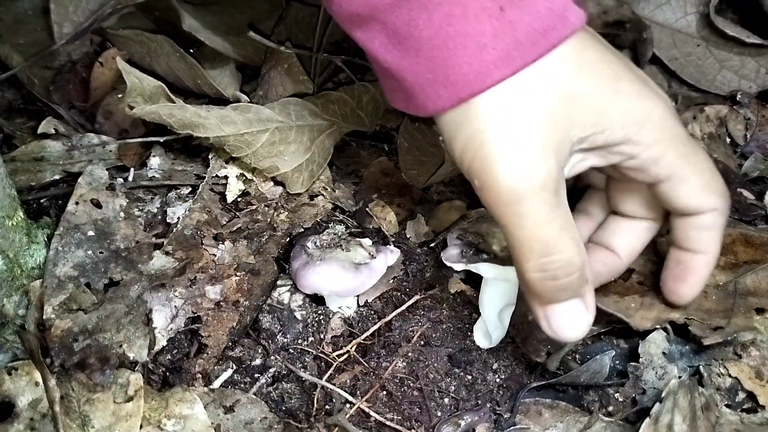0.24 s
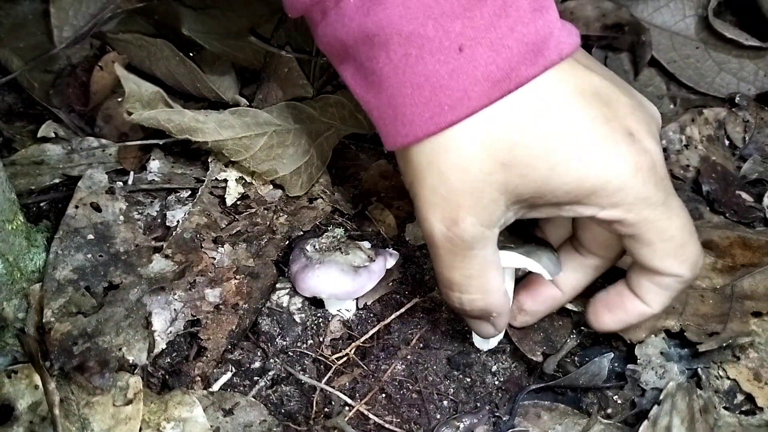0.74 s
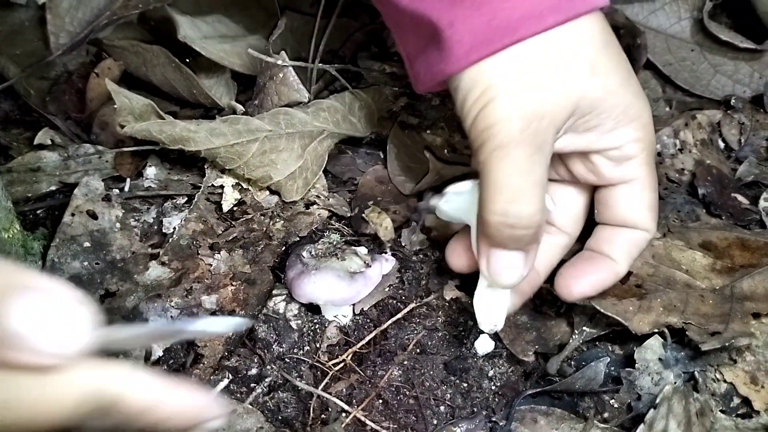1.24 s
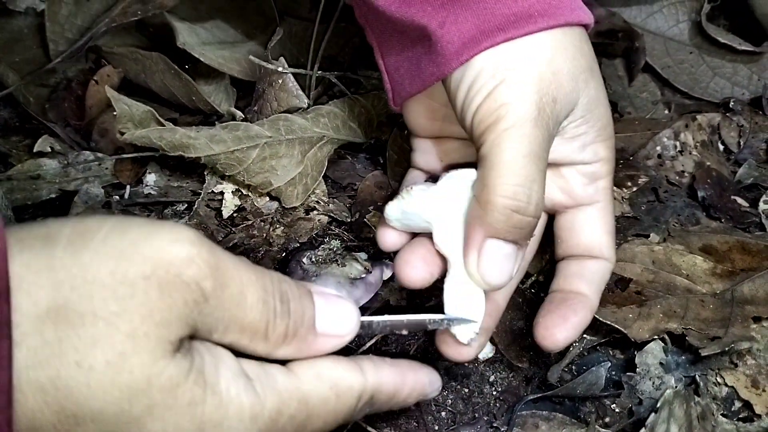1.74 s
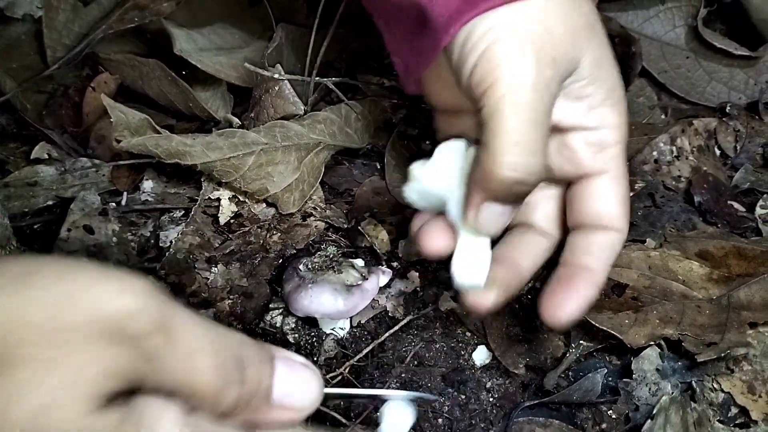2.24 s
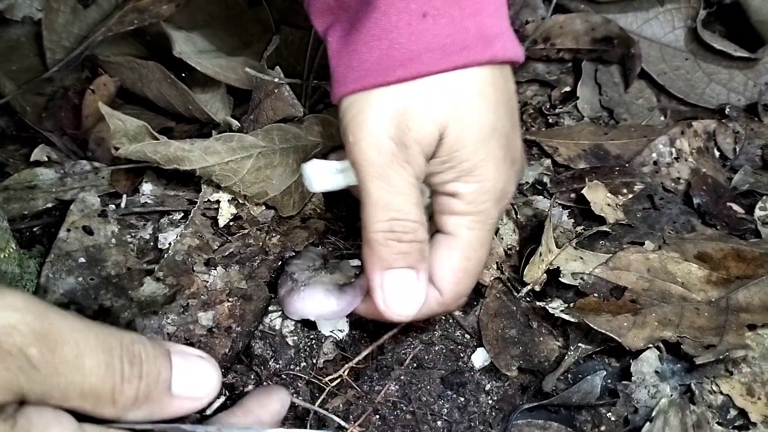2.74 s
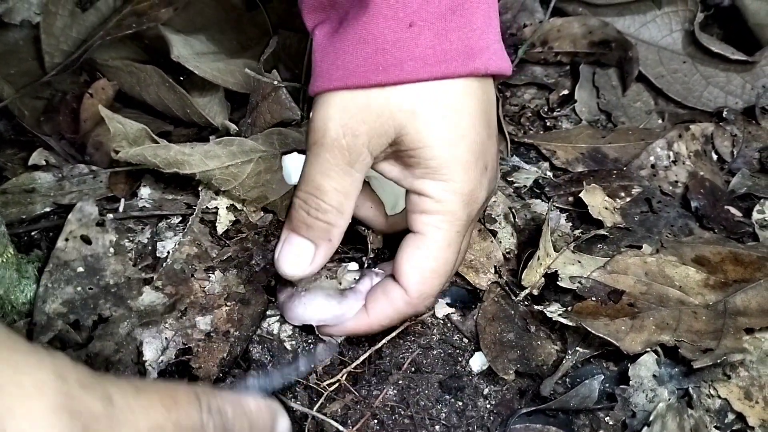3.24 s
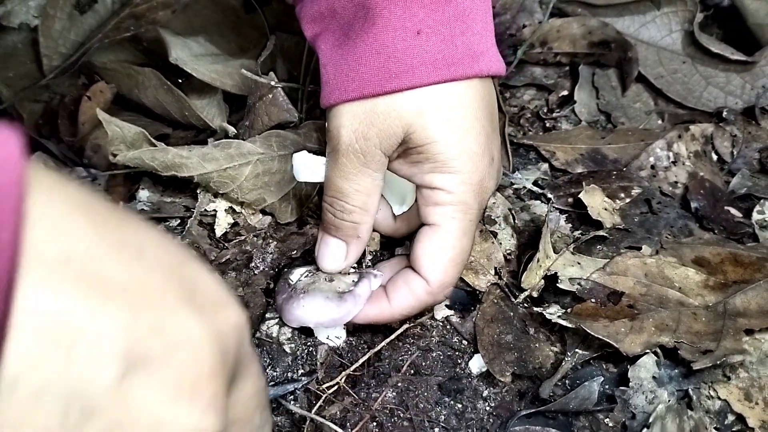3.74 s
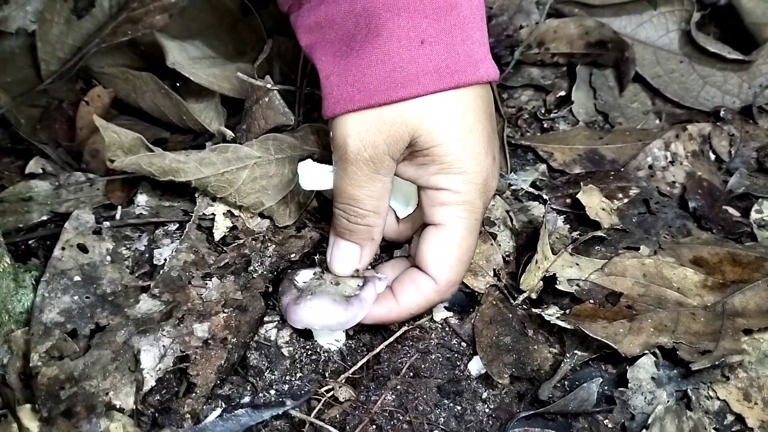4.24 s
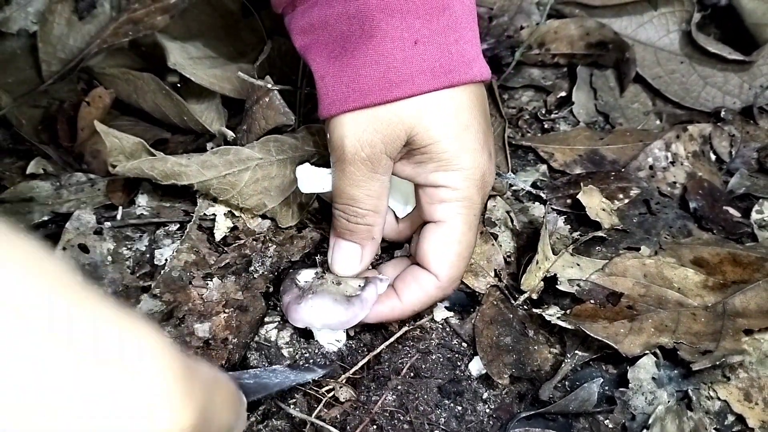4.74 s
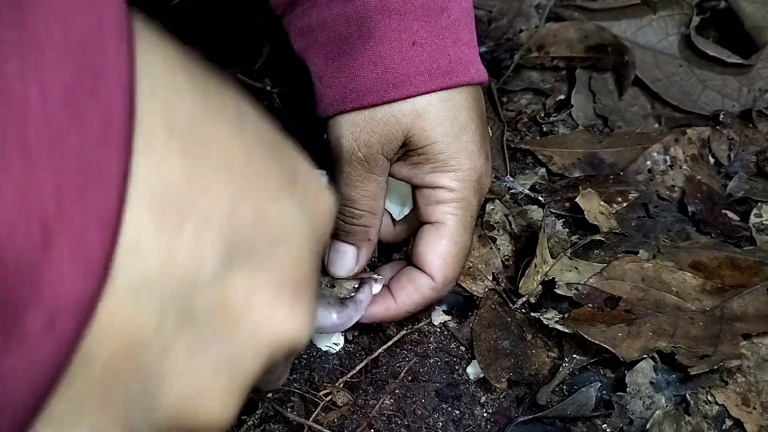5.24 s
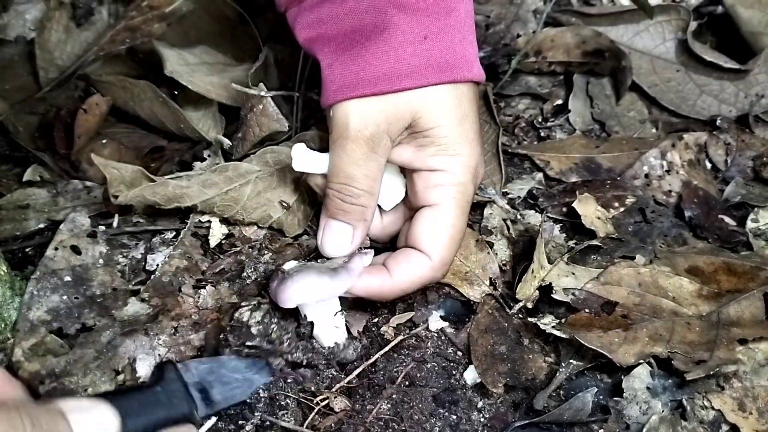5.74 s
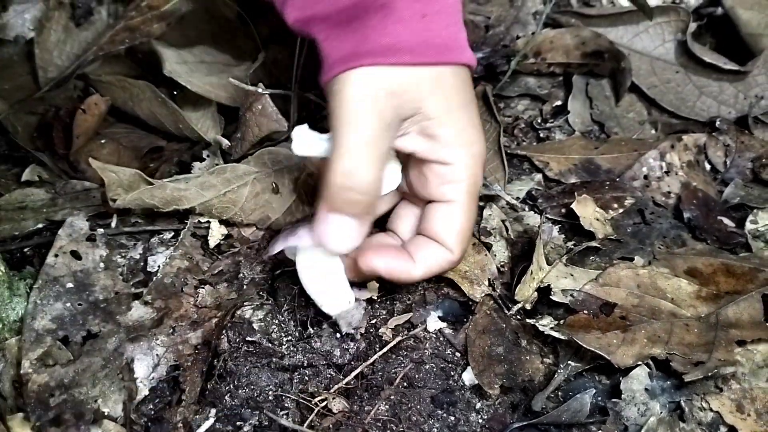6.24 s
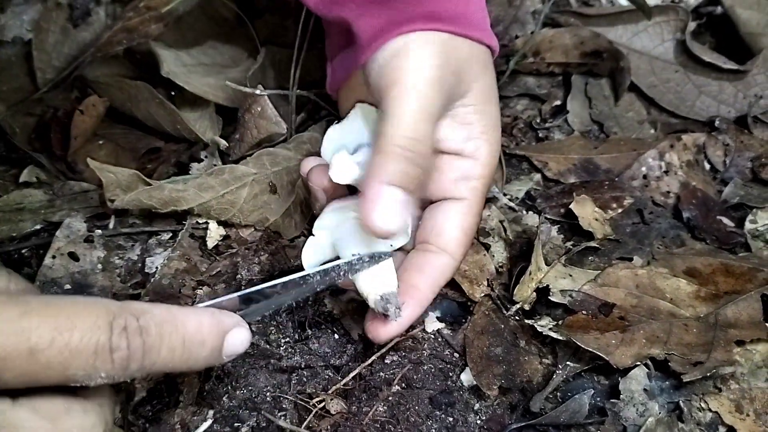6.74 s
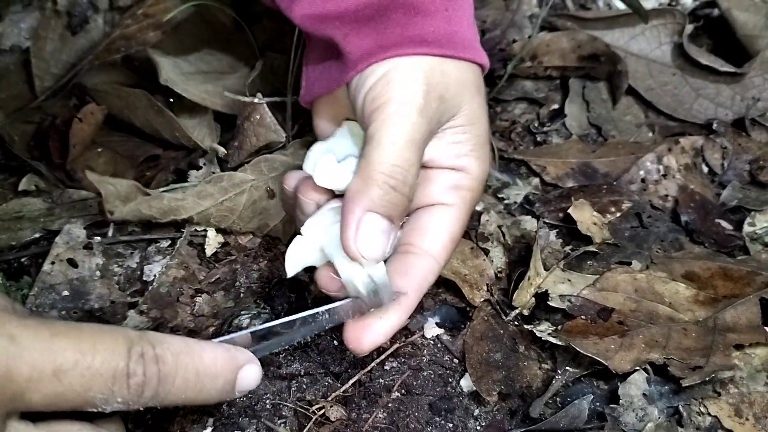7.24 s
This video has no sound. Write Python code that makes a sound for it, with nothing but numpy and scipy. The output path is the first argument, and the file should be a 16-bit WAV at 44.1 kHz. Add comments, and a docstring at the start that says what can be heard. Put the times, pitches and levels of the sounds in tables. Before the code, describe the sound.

Delicate, dry foraging sounds close to the microphones: brushing leaves, flicked flakes, brittle little breaks and dull taps of fingers and a knife in the earth. Short bursts alternate with near-quiet pauses. One clear snap comes early, a dense crunchy dig later, and sparse crackles end it. Outdoors, faint low rumble, gentle hiss and two far engines hum, one swelling and falling twice.

```python
"""Dry leaf litter on a forest floor, close to two microphones: hands pick and trim two mushrooms.
Leaves crackle as shaped noise driven by dense random fractures, and loose flakes ring as decaying sines.
Snapping stalks and twigs are short noise bursts, filtered by soil, leaf blade and leaf edge.
Knife and fingers knock the soil, which adds low damped sines.
Behind lie filtered-noise rumble and hiss, and the hum of two far engines as sums of sines."""
import sys
import numpy as np
from scipy import signal
from scipy.fft import rfft, irfft, next_fast_len
from scipy.io import wavfile
from scipy.ndimage import uniform_filter1d, map_coordinates

SR = 44100
rng = np.random.default_rng(int(sys.argv[2]) if len(sys.argv) > 2 else 0)


def file_out(sig):
    """Save sig as 16-bit WAV at sys.argv[1]."""
    # one column per channel
    cols = np.atleast_2d(sig).T
    # limit, then scale
    lim = np.clip(cols, -1, 1)
    pcm = np.round(lim * 32767).astype(np.int16)
    wavfile.write(sys.argv[1], SR, pcm)


N = 330023

# Background noise colours, relative: [f/Hz, level per Hz/dB]
RUMBLE_COLOUR = [(15, -1.5), (28, -15.5), (45, 1), (65, -3), (100, 0.5), (150, -7), (210, -8), (300, -12.5),
                 (500, -16.5), (1000, -33), (3000, -79)]
HISS_COLOUR = [(200, -2.5), (600, 11.5), (1200, 7.5), (2300, 0.5), (3600, -9), (5600, -21), (7100, -13),
               (7850, 5.5), (8700, -58), (11000, -39), (12800, 2), (14500, -19)]
# A far engine idling, before order levels and balance: [t/s, f/Hz, level/dB]
IDLING_TRACK = [(0, 63.1, -72.5), (2.6, 63.27, -65), (3.6, 63.1, -68), (7.5, 63, -63)]
# Its audible orders: [multiple of f, relative level/dB]
IDLING_ORDERS = [(0.98, -1.7), (2, 0), (7 / 3, -4.5)]
# A far engine that pulls away twice, before order levels and balance: [t/s, f/Hz, level/dB]
PULLING_TRACK = [(0, 84.4, -73), (.45, 87.7, -64.5), (.95, 100.5, -59), (1.25, 101, -71), (2.3, 87.15, -67),
                 (3.1, 87.05, -69), (3.8, 98, -59), (4.3, 103.8, -62.5), (4.8, 105, -84), (6.4, 79.4, -73),
                 (7.5, 88.3, -62)]
# Its audible orders: [multiple of f, relative level/dB]
PULLING_ORDERS = [(4 / 5, -2), (1, 0)]
HUM_WAVER_HZ = 7.7  # random knots a second in the engines' level, on the way through the trees

# Colours of what a fracture sets ringing, relative: [f/Hz, level per Hz/dB]
SOIL_COLOUR = [(40, -39), (90, -2), (130, 0.5), (175, -2.5), (215, -5.5), (295, -8.5), (340, 0),
               (440, -0.5), (540, -3.5), (800, -27), (1500, -39)]
BLADE_COLOUR = [(300, -19.5), (600, -3.5), (770, 7.5), (870, 4), (1050, 5), (1300, 4), (1750, -8.5),
                (2150, -3.5), (2700, -5.5), (3400, -9.5), (4500, -10.5), (8000, -64)]
EDGE_COLOUR = [(1800, -33.5), (3000, -3.5), (3900, 0.5), (5300, 5), (7000, 0), (9500, -3.5), (11500, -1.5),
               (13200, 1), (14500, -10)]
# A light touch leaves only the small, stiff parts of a leaf ringing: [f/Hz, level per Hz/dB]
LIGHT_BLADE_COLOUR = [(300, -29), (650, -4.5), (850, 0), (1150, 0.5), (1600, -2), (2150, 3), (2700, -3.5),
                      (3400, 0.5), (4500, -8.5), (8000, -64.5)]
# Left-right likeness of the spread-out litter: [f/Hz, correlation (1)]
LITTER_ALIKE = [(100, 0.48), (400, 0.61), (900, 0.14), (2000, 0.28), (3500, 0.062), (12000, 0.024)]
# Left-right likeness of one break, which comes from one spot: [f/Hz, correlation (1)]
BREAK_ALIKE = [(100, 0.73), (400, 0.79), (900, 0.3), (2000, 0.68), (3500, 0.23), (12000, 0.17)]
# Port tilt: [f/Hz, level/dB added on the left and taken off on the right]
PORT_TILT = [(300, 0), (1200, 0), (2200, -3), (3300, 2), (5000, -2.5), (7000, -1), (9500, 0.5),
             (12500, -0.5)]

# Fingers and knife knocking into the ground, levels as rms over 10 ms, t60 before the hold shares:
# [t/s, soil level/dB, soil f/Hz, blade level/dB, blade f/Hz, t60/s]
KNOCKS = [(2.8188, -48, 375, -49.5, 2170, 0.011), (2.8232, -46.5, 363, -38, 1040, 0.036),
          (3.6833, -58, 430, -45.5, 1130, 0.013), (3.6917, -53.5, 440, -51, 1110, 0.029),
          (4.0512, -54, 377, -55.5, 2040, 0.0057), (4.1314, -54.5, 440, -52.5, 1700, 0.016),
          (4.214, -43.5, 262, -42, 1900, 0.015), (5.2286, -39.5, 368, -36, 2310, 0.017),
          (5.264, -50, 400, -43, 1300, .008), (5.269, -40.5, 414, -48, 1010, 0.078),
          (5.309, -36.5, 384, -36.5, 815, 0.03), (5.327, -37, 342, -38, 800, 0.033),
          (5.3479, -46, 398, -40.5, 774, 0.072), (5.651, -49, 426, -37.5, 830, 0.049),
          (5.6918, -49.5, 463, -35.5, 1700, 0.0054), (6.1837, -55, 450, -46.5, 1690, 0.02),
          (6.201, -58, 400, -49, 1150, 0.012)]
SOIL_PEAK_DB = 10  # height of a knock's own soil resonance over 0 dB of the soil colour
# Crisp edge against a blade ringing at 1 kHz; smaller, stiffer leaves are crisper
KNOCK_EDGE_DB, KNOCK_EDGE_DB_PER_OCTAVE = -13, 10.5
# Dry leaves, stalks and rootlets breaking, levels as rms over 10 ms, t60 before the hold shares:
# [t/s, blade level/dB, blade f/Hz, crisp edge level/dB, t60/s, left-over-right level/dB]
SNAPS = [(0.335, -56, 3320, -48.5, .07, -2), (0.402, -53, 3350, -57, 0.081, 0),
         (0.615, -48.5, 1660, -44.5, .043, -5), (0.822, -53.5, 3100, -46.5, .07, -9),
         (0.9953, -62, 1360, -52.5, .018, -3), (1.026, -47, 1220, -52, 0.073, -9),
         (1.123, -51.5, 1744, -72, .035, -3), (1.2005, -48, 3240, -47.5, 0.0043, -3),
         (1.3588, -48, 2210, -39, .011, 3), (1.3864, -36.5, 2130, -34.5, 0.063, 3),
         (1.4089, -27, 2150, -35, 0.014, -0.5), (1.6408, -53.5, 2140, -50.5, 0.028, -2),
         (1.6762, -49.5, 2190, -46.5, .073, 0), (1.929, -57, 1380, -72, 0.011, -1),
         (1.9615, -41.5, 2460, -43.5, 0.033, 2), (2.414, -57, 2200, -44.5, 0.05, 3),
         (2.4891, -62, 2400, -43, 0.064, 0), (3.017, -43, 1990, -46, 0.019, -7),
         (3.077, -37.5, 2000, -40.5, 0.054, -1), (3.1593, -60, 3100, -37, 0.022, -4),
         (3.203, -49, 1250, -56, 0.068, 0), (3.306, -59, 2700, -49.5, 0.0081, 1),
         (3.822, -57.5, 1020, -56, .014, 14), (3.844, -51.5, 2150, -39, 0.017, 5),
         (3.9358, -44.5, 2140, -50, 0.0051, -8), (3.975, -69, 2850, -51.5, .019, 0),
         (4.365, -82, 2200, -54.5, 0.022, 0), (5.136, -70, 3230, -51.5, 0.036, -2),
         (5.1712, -46, 2220, -43, 0.006, -2.5), (5.6001, -39.5, 1580, -42, .005, -6),
         (5.6425, -48, 1820, -40, 0.061, -1), (5.687, -38, 1740, -46, 0.036, 4),
         (5.728, -42, 2270, -40.5, 0.048, 4), (5.7557, -34, 2020, -48, 0.019, 4.5),
         (5.8205, -35.5, 1050, -34, 0.011, 1.5), (5.922, -50, 2280, -48, .049, 8),
         (6.0959, -71, 1800, -47, 0.063, -2), (6.2336, -58, 3240, -47.5, 0.012, 0),
         (6.3512, -45.5, 1630, -48, .036, 2), (6.441, -50.5, 1160, -59, 0.077, 9),
         (6.635, -69, 2520, -61.5, 0.012, -7.5), (6.7616, -90, 2000, -54.5, 0.0068, -2),
         (6.8953, -50.5, 3470, -45.5, 0.086, -5), (7.3317, -49.5, 3370, -44, 0.083, 0),
         (7.44, -56.5, 1930, -60, 0.043, -9)]
SNAP_SOIL_DB, SNAP_SOIL_HZ = -25.5, 490  # a break barely shakes the soil: level against blade, resonance
EDGE_HZ, EDGE_SCATTER = 5700, 0.42  # where a breaking edge rings, and its log spread between breaks

# Hands moving through the litter: feeling for, pulling up and trimming the first stem, reaching across,
# gripping the second, probing, digging in the knife, levering, lifting clear and scraping the stem:
# [t/s of the height, rise/s, fall/s, blade level/dB before the mix trim,
#  pressure (0 = brushing leaf edges, 1 = pushing into the soil)]
STROKES = [(0.27, 0.17, 0.033, -57, 0.39), (0.41, 0.02, 0.013, -57, 0.043), (0.62, 0.03, 0.033, -61, 0.45),
           (0.82, 0.21, 0.07, -63.5, 0.24), (1.04, 0.048, 0.095, -60, 0.4), (1.15, 0.02, .07, -56, .3),
           (1.29, 0.15, 0.08, -52, 0.33), (1.41, 0.089, .12, -51, 0.34), (1.612, 0.099, 0.018, -54.5, 0.18),
           (1.69, 0.049, 0.069, -57.5, 0.18), (1.98, 0.016, 0.033, -53, 0.3),
           (2.09, 0.054, 0.026, -60.5, 0), (2.25, .015, 0.13, -65, 0), (2.40, 0.036, 0.064, -47.5, 0.13),
           (2.47, 0.062, 0.07, -52, 0.4), (2.73, 0.047, 0.038, -60, 0.34),
           (2.837, 0.0057, 0.023, -50, 0.65), (2.94, 0.1, 0.043, -59.5, 0.21),
           (3.09, 0.076, .06, -51, 0.46), (3.18, 0.063, 0.036, -51, 0.029),
           (3.26, 0.071, 0.078, -61.5, 0.41), (3.70, 0.055, 0.084, -60, 0.48),
           (3.85, 0.046, 0.024, -56, 0.35), (3.98, 0.18, 0.11, -60, 0.39), (4.14, 0.04, 0.038, -57.5, 0.64),
           (4.232, 0.031, 0.053, -51.5, 0.33), (4.31, .05, 0.12, -70, 0.018),
           (4.69, 0.042, 0.17, -69, 0.092), (5.18, 0.037, 0.15, -53, 0.69), (5.28, 0.033, 0.043, -47, 0.27),
           (5.32, 0.047, 0.06, -41.5, 0.68), (5.49, 0.057, 0.044, -60.5, 0.15),
           (5.60, 0.1, 0.088, -49.5, 0.57), (5.71, 0.053, .075, -41, 0.55), (5.85, 0.043, 0.064, -47, 0.38),
           (5.91, .05, 0.058, -46.5, 0.45), (6.025, 0.031, 0.018, -64.5, 0),
           (6.20, .02, 0.061, -52.5, 0.83), (6.35, 0.13, 0.27, -64, 0.23),
           (6.54, 0.026, 0.055, -63.5, 0.47), (7.258, 0.011, 0.082, -61.5, 0),
           (7.35, 0.1, 0.052, -64.5, 0.58)]
STROKE_DROP_DB, STROKE_SHAPE = 9, 1.53  # drop one rise before and one fall after; above 1 = rounded top
# Faint stir of leaves under the hand between strokes: [t/s, blade level/dB before the mix trim]
STIR = [(0, -59), (1.2, -69.5), (1.85, -70), (2.2, -70), (3.0, -67), (4.4, -70), (4.95, -71.5), (6.3, -67),
        (6.8, -73), (7.2, -75.5), (7.48, -66)]
STIR_PRESSURE = 0.39
SOIL_DB, SOIL_PRESS_DB = -23.5, 24.5  # soil against blades at no pressure; what full pressure adds
EDGE_DB, EDGE_PRESS_DB = 8.5, -11.5  # the same for the crisp edges
BEND_FROM_DB, BEND_RANGE_DB = -15, 7.5  # soil against blades where whole leaves start to bend; range to all

FADE_IN_S = 0.36
TOP_HZ = 14400  # band limit


def amp(db):
    """Decibel law: level to amplitude ratio."""
    return 10 ** (np.asarray(db) / 20)


def unit(x):
    """Normalisation to unit rms."""
    return x / np.sqrt(np.mean(x ** 2) + 1e-20)


def along(points, hz):
    """Interpolation of [f/Hz, value] points on a logarithmic frequency axis."""
    f, v = np.transpose(points)
    return np.interp(np.log(hz + 1), np.log(f + 1), v)


def curves(rows):
    """Linear interpolation in time: one value per sample for each column after t/s."""
    s, *cols = np.transpose(rows)
    return [np.interp(np.arange(N) / SR, s, c) for c in cols]


def wobble(rate):
    """Spline through Gaussian knots: a smooth random curve with rate knots a second."""
    knots = rng.standard_normal(int(N * rate / SR) + 4)
    return map_coordinates(knots, [np.arange(N) * rate / SR])


def grid(x):
    """Zero padding: an even FFT length longer than x, and its frequencies."""
    m = 2 * next_fast_len(x.shape[-1] // 2 + 1024)
    return m, np.fft.rfftfreq(m, 1 / SR)


def ring(x, spectrum, peak_hz=1000, peak_db=0, octaves=.2):
    """Minimum-phase filtering: x excites a body of this colour, with an optional resonance peak_db over 0 dB."""
    m, hz = grid(x)
    gain = amp(along(spectrum, hz))
    if peak_db:
        detune = np.log2((hz + 1) / peak_hz) / octaves
        gain = np.hypot(gain, amp(peak_db) / (1 + detune ** 2) ** 1.6)
    # folding the cepstrum onto positive time makes the response causal
    cepstrum = irfft(np.log(gain), m)
    cepstrum[1:m // 2] *= 2
    cepstrum[m // 2 + 1:] = 0
    response = np.exp(rfft(cepstrum))
    return irfft(rfft(x, m) * response, m)[..., :x.shape[-1]]


def ports(pair, alike=LITTER_ALIKE, lag_ms=0.344):
    """Partial coherence: two unrelated signals become a partly alike stereo pair, the right port lagging."""
    m, hz = grid(pair)
    turn = np.arccos(np.clip(along(alike, hz), 0, 1)) / 2
    mid, side = rfft(pair, m) * [np.cos(turn), np.sin(turn)]
    tilt = amp(along(PORT_TILT, hz))
    late = np.exp(-2j * np.pi * hz * lag_ms / 1000)
    left = (mid + side) * tilt
    right = (mid - side) * late / tilt
    return irfft([left, right], m)[:, :pair.shape[-1]]


def engine(track, orders, waver_db):
    """Harmonic orders: a far engine's few audible multiples of one pitch waver on the way through the trees."""
    hz, db = curves(track)
    phase = 2 * np.pi * np.cumsum(hz * (1 + 0.0053 * wobble(4.4))) / SR
    hum = 0
    for multiple, level in orders:
        waver = waver_db * wobble(HUM_WAVER_HZ)
        hum = hum + amp(db + level + waver) * np.sin(multiple * phase)
    return hum


def air(spectrum, width):
    """Mid-side synthesis: coloured noise whose side part sets the stereo width."""
    mid, side = ring(rng.standard_normal((2, N)), spectrum)
    return unit(np.array([mid + width * side, mid - width * side]))


def forest(rumble_db=-61.5, hiss_db=-69, rumble_width=0.83, hiss_width=0.97):
    """Superposition of low rumble, faint hiss and the hum of two far engines."""
    hum = engine(IDLING_TRACK, IDLING_ORDERS, waver_db=3.5) + engine(PULLING_TRACK, PULLING_ORDERS, waver_db=2.5)
    rumble = amp(rumble_db + 1.2 * wobble(10)) * air(RUMBLE_COLOUR, rumble_width)
    balance = amp([[1.1], [-1.1]])  # left and right, in dB
    hiss = amp(hiss_db + 0.65 * wobble(3.28)) * air(HISS_COLOUR, hiss_width)
    return (rumble + hum) * balance + hiss


def thumps(hz=168, scatter=0.11, t60=.05, attack_s=0.00098, db=-1, grows=0.86, size=4096):
    """Damped oscillation: under each knock the ground gives one low bounce, grows dB per dB of the knock."""
    out, t = np.zeros(N + size), np.arange(size) / SR
    heaviest_db = max(row[1] for row in KNOCKS)
    for (s, soil_db, *_), chance in zip(KNOCKS, rng.standard_normal(len(KNOCKS))):
        level_db = heaviest_db + db + grows * (soil_db - heaviest_db)
        pitch = hz * np.exp(scatter * chance)
        bounce = np.sin(2 * np.pi * pitch * t) * (1 - np.exp(-t / attack_s))
        out[round(s * SR):][:size] += amp(level_db - 60 * t / t60) * bounce
    return out[:N]


def contacts(snap_peak_db=13.0, knock_peak_db=9):
    """Selective excitation: a snap rings a leaf's stiff parts, a centred knock bends it whole and thuds in soil."""
    # yields t/s, t60/s, pan/dB, soil and blade as (colour, level/dB, f/Hz, peak/dB), edge level/dB
    for s, blade_db, blade_hz, edge_db, t60, pan_db in SNAPS:
        soil = (SOIL_COLOUR, blade_db + SNAP_SOIL_DB, SNAP_SOIL_HZ, 3)
        blade = (LIGHT_BLADE_COLOUR, blade_db, blade_hz, snap_peak_db)
        yield s, t60, pan_db, soil, blade, edge_db
    for s, soil_db, soil_hz, blade_db, blade_hz, t60 in KNOCKS:
        edge_db = blade_db + KNOCK_EDGE_DB + KNOCK_EDGE_DB_PER_OCTAVE * np.log2(blade_hz / 1000)
        soil = (SOIL_COLOUR, soil_db, soil_hz, SOIL_PEAK_DB)
        blade = (BLADE_COLOUR, blade_db, blade_hz, knock_peak_db)
        yield s, t60, 0, soil, blade, edge_db


def broadband(x, size=25):
    """Spectral whitening: a fracture feeds all frequencies alike, so its colour comes from what it rings."""
    z = rfft(x)
    local_power = abs(uniform_filter1d(abs(z) ** 2, size, axis=-1))
    return irfft(z / np.sqrt(local_power + 1e-12), x.shape[-1])


def snaps(rise_ms=0.17, strain_ms=0.78, strain_db=-15, grain_db=4.5, soil_hold=1.77, blade_hold=1.0,
          edge_hold=0.97, edge_peak_db=3, size=3072):
    """Brittle fracture: creaking strain, then a quick run of breaks rings soil, blade and edge; knocks likewise."""
    lead = SR // 160  # samples of strain ahead of the break
    out, t = np.zeros((2, N + size)), (np.arange(size) - lead) / SR
    before, after = np.maximum(-t, 0), np.maximum(t, 0)
    strain = amp(strain_db) * np.exp(-before * 1000 / strain_ms)
    attack = np.maximum(strain, (1 - np.exp(-after * 1000 / rise_ms)) ** 2)
    for s, t60, pan_db, soil, blade, edge_db in contacts():
        unevenness = unit(uniform_filter1d(rng.standard_normal(size), size=16))
        grain = attack * amp(grain_db * unevenness)
        start = round(s * SR) - lead
        sides = unit(amp(pan_db / 2 * np.array([[1], [-1]])))
        edge_hz = EDGE_HZ * np.exp(EDGE_SCATTER * rng.standard_normal())
        edge = (EDGE_COLOUR, edge_db, edge_hz, edge_peak_db)
        # (body, resonance width in octaves, share of the t60, lag between the ports in ms)
        parts = [(soil, .16, soil_hold, .13), (blade, .2, blade_hold, .38), (edge, .3, edge_hold, .38)]
        for (spectrum, db, hz, peak_db), octaves, hold, lag_ms in parts:
            decay = amp(-60 * after / (t60 * hold))
            run = broadband(grain * decay * rng.standard_normal((2, size)))
            burst = ports(ring(run, spectrum, hz, peak_db, octaves), BREAK_ALIKE, lag_ms)
            burst /= np.sqrt(np.sum(burst ** 2, axis=1, keepdims=True) / (SR / 100))  # rms over 10 ms
            out[:, start:start + size] += amp(db) * sides * burst
    return out[:, :N]


def fractures(rate, spread_db, bed, life_ms):
    """Shot noise: random tiny breaks of uneven size, each a short fizz, over a bed of sliding friction."""
    count = int(rate * N / SR)
    draws = rng.random((count, 2))
    size = amp(spread_db * np.minimum(-np.log(1 - draws[:, 1]), 4.5))
    power = np.bincount((draws[:, 0] * N).astype(int), size ** 2, N)
    # power decays twice as fast as amplitude
    power = signal.lfilter([1], [1, -np.exp(-2000 / (life_ms * SR))], power)
    envelope = np.sqrt(power / power.mean() + abs(bed) + 1e-12)
    return envelope * rng.standard_normal((2, N))


def ticks(rate, centre_hz, scatter, cycles, spread_db, size=480):
    """Free vibration: each leaf flake flicked loose rings at its own pitch and place, losing 60 dB in cycles."""
    count = int(rate * N / SR)
    when, place, strength, phase = rng.random((count, 4)).T[:, :, None]
    hz = np.clip(centre_hz * np.exp(scatter * rng.standard_normal((count, 1))), 700, 14000)
    turns = hz * np.arange(size) / SR
    flake_db = spread_db * np.minimum(-np.log(1 - strength), 4)
    onset = 1 - np.exp(-2 * turns)
    taper = 1 - (np.arange(size) / size) ** 2
    decay = amp(flake_db - 60 * turns / cycles) * onset * taper
    at = (when * (N - size)).astype(int) + np.arange(size)

    def heard(gain, shift):
        flakes = gain * decay * np.sin(2 * np.pi * (turns + shift))
        return np.bincount(at.ravel(), flakes.ravel(), N)
    return unit(np.array([heard(.5 + place, 0), heard(1.5 - place, phase)]))


def patchy(x, depth_db, size):
    """Time-varying filtering: each leaf under the fingers favours its own pitches for a moment."""
    z = signal.stft(x, nperseg=256)[2]
    field = rng.standard_normal(z.shape[1:])
    field = uniform_filter1d(field, size[0], axis=0)  # smooth over pitch
    field = uniform_filter1d(field, size[1], axis=1)  # smooth over time
    return signal.istft(z * amp(depth_db * unit(field)), nperseg=256)[1][:, :N]


def handling():
    """Addition of powers of soil, blades and edges: pressing shifts more soil and muffles the edges."""
    t = np.arange(N) / SR
    moves = [(curves(STIR)[0], STIR_PRESSURE)]
    for s, rise_s, fall_s, db, pressure in STROKES:
        away = np.maximum((s - t) / rise_s, (t - s) / fall_s)
        moves.append((db - STROKE_DROP_DB * np.minimum(away, 8) ** STROKE_SHAPE, pressure))
    power = np.zeros((3, N))
    for db, pressure in moves:
        p = np.clip(pressure, 0, 1)
        shares_db = [SOIL_DB + SOIL_PRESS_DB * p, 0, EDGE_DB + EDGE_PRESS_DB * p]
        power += np.outer(amp(shares_db) ** 2, amp(db) ** 2)
    return power


def blend(a, b, share):
    """Equal-power crossfade: b takes this share of the power."""
    share = np.clip(share, 0, 1)
    return np.sqrt(1 - share) * a + np.sqrt(share) * b


def rustle(blade_flakes=0.44, edge_flakes=0.14, blade_crackle=0.067, edge_crackle=0.07):
    """Friction and fracture: fingers scrape and break edges, flex blades, flick flakes loose and shift the soil."""
    soil_db, blade_db, edge_db = 10 * np.log10(handling())
    clumps = amp(2.03 * wobble(70))  # the leaves catch and let go

    def voice(breaks, spectrum):
        return unit(ports(ring(breaks * clumps, spectrum)))
    soil = voice(fractures(rate=87, spread_db=-0.5, bed=0.09, life_ms=1.5), SOIL_COLOUR)
    flex = fractures(rate=400, spread_db=2.5, bed=1, life_ms=0.86)
    heavy = (soil_db - blade_db - BEND_FROM_DB) / BEND_RANGE_DB  # pressing into the soil bends whole leaves
    blade = blend(voice(flex, LIGHT_BLADE_COLOUR), voice(flex, BLADE_COLOUR), heavy)
    blade_ticks = ticks(rate=300, centre_hz=2234, scatter=0.245, cycles=90, spread_db=1.5)
    blade = blend(blade, blade_ticks, blade_flakes)
    edge = voice(fractures(rate=730, spread_db=1.5, bed=12.0, life_ms=0.25), EDGE_COLOUR)
    edge_ticks = ticks(rate=460, centre_hz=6220, scatter=0.383, cycles=66, spread_db=1.0)
    edge = blend(edge, edge_ticks, edge_flakes)
    crackle = fractures(rate=70, spread_db=2.0, bed=0, life_ms=0.39)  # whole veins break
    blade = blend(blade, unit(ports(ring(crackle, LIGHT_BLADE_COLOUR))), blade_crackle)
    edge = blend(edge, unit(ports(ring(crackle, EDGE_COLOUR))), edge_crackle)
    leaves = patchy(amp(blade_db) * blade + amp(edge_db) * edge, depth_db=2.5, size=(4, 14))
    return amp(soil_db - 0.5) * soil + amp(-1.44) * leaves  # mix trims in dB


def scene():
    """Superposition: the quiet forest behind thumps, snaps, knocks and rustle."""
    return forest() + thumps() + snaps() + rustle()


def record(dry):
    """Band limitation: the sound fades in and passes a very steep low-pass."""
    m, hz = grid(dry)
    fade = np.minimum(np.arange(N) / SR / FADE_IN_S, 1) ** 1.12
    low_pass = 1 / np.sqrt(1 + (hz / TOP_HZ) ** 220)
    return irfft(rfft(dry * fade, m) * low_pass, m)[:, :N]


dry = scene()
out = record(dry)
file_out(out)
```